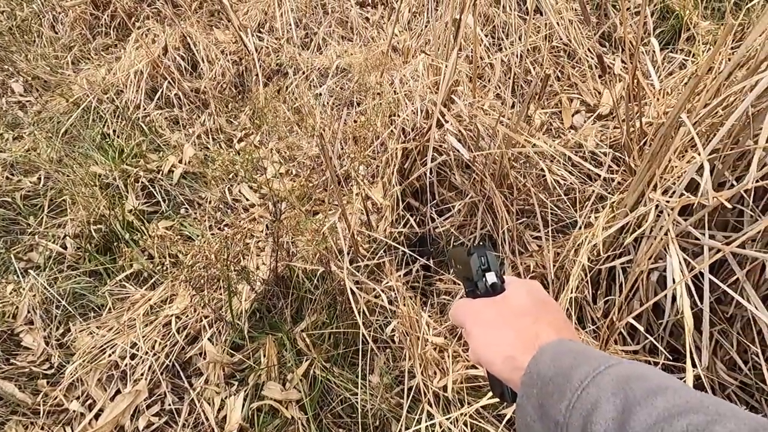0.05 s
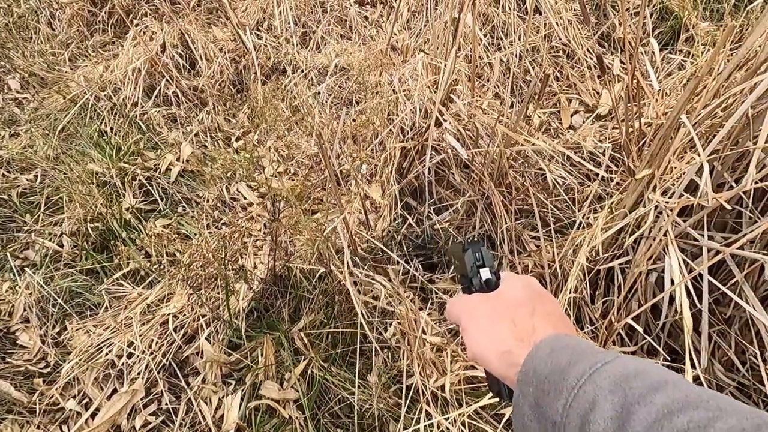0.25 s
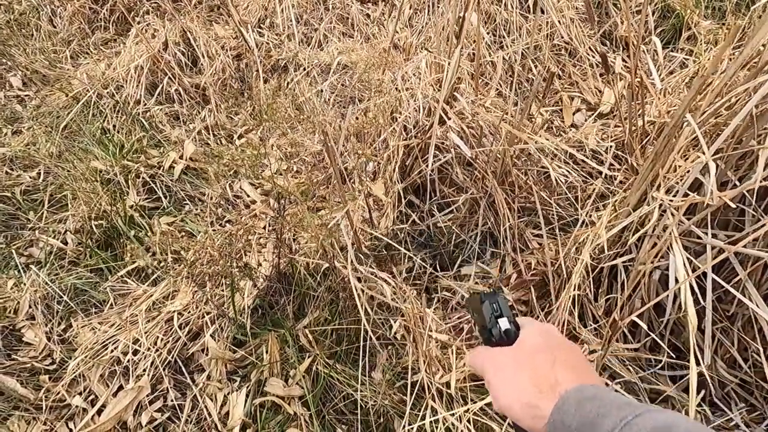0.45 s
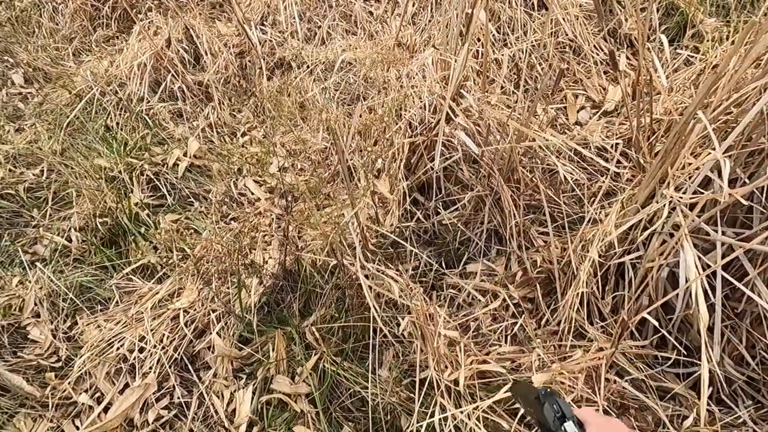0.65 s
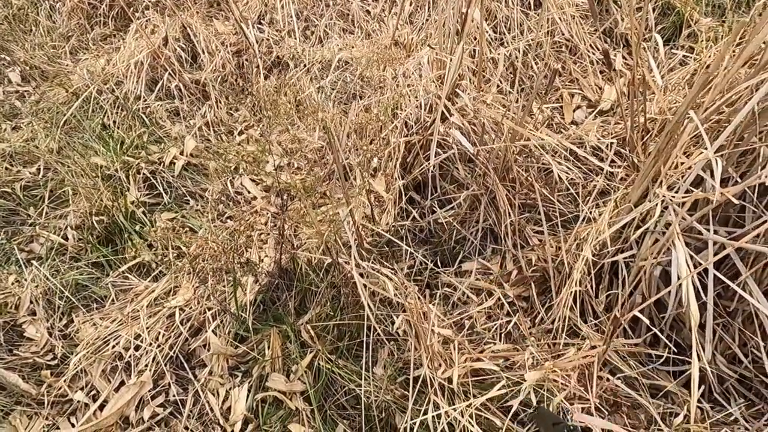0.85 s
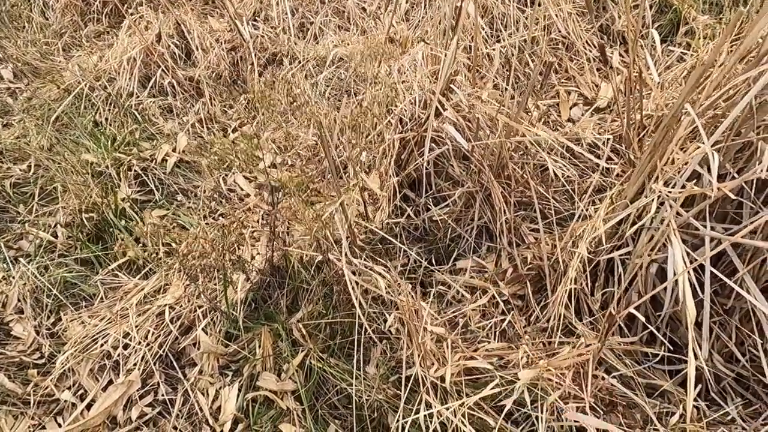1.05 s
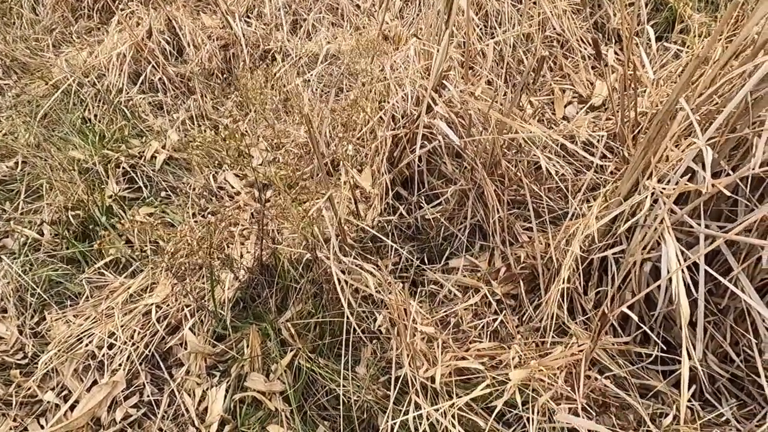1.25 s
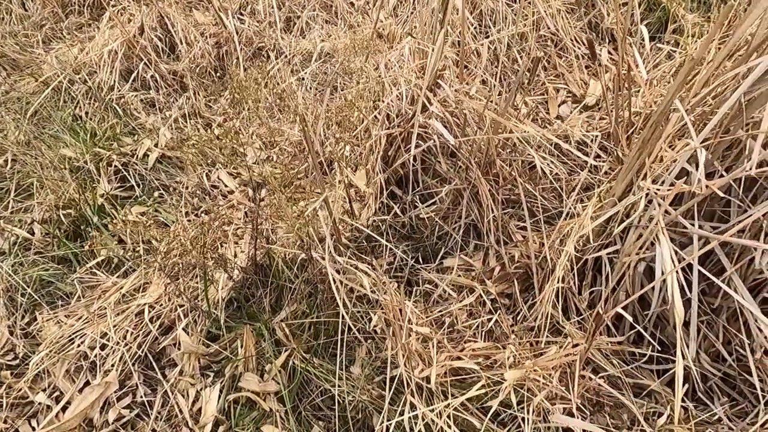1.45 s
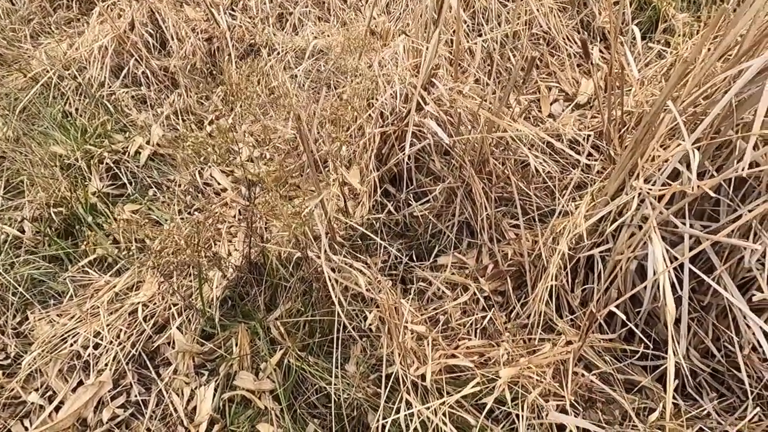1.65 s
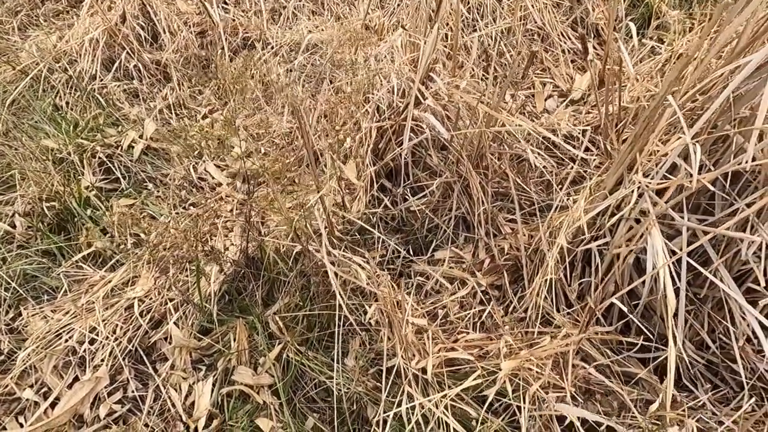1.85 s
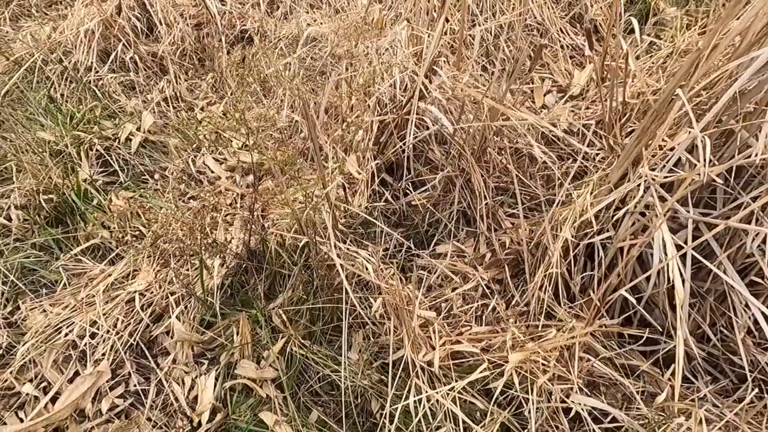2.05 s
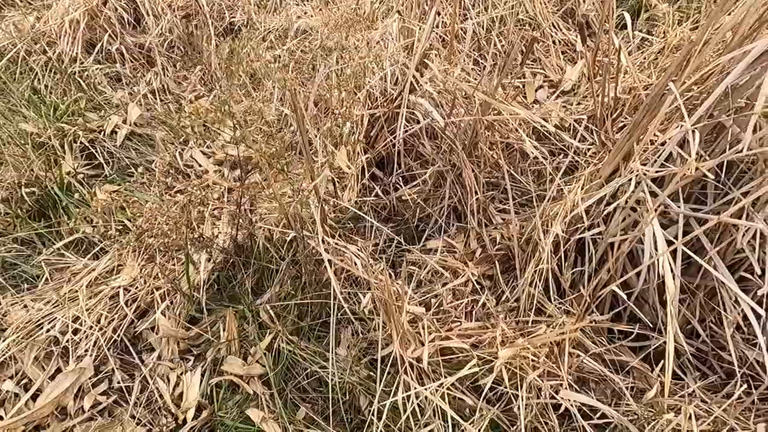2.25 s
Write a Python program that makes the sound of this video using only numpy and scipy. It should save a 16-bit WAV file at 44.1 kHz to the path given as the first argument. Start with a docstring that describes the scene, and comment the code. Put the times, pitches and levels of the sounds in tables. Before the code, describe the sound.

A single pistol shot very close to the microphone outdoors, a hard clipped crack with a short falling boom and faint echoes; then quiet hiss, dry stalk ticks, one metal click and a final knock on the camera.

```python
"""Outdoors over dry grass: one pistol shot close to the microphone, with wind and hiss.
Shaped noise and wandering sines swell into a crack of noise fronts, decaying modes and a falling sine boom.
Noise bursts give the scatter, the faint echoes, the ticking stalks and a soft bump as the arm comes down.
The pistol clicks once as noise and steel modes; at the end a hand knocks (damped modes) and rubs (noise)
on the camera. Wind is fluttering low noise; the hiss dips after the shot, then rises unevenly."""
import sys
import numpy as np
from scipy import signal
from scipy.fft import rfft, irfft
from scipy.io import wavfile

SR = 44100
rng = np.random.default_rng(int(sys.argv[2]) if len(sys.argv) > 2 else 0)


def unload_audio(sound):
    """Save the sound as a 16-bit wav file, at the path given as the first command line argument."""
    columns = np.transpose(np.atleast_2d(sound))
    # keep every value between -1 and 1, then stretch to whole-number steps
    steps = np.round(np.clip(columns, -1, 1) * 32767)
    wavfile.write(sys.argv[1], SR, steps.astype(np.int16))


N = 101429
T = np.arange(N) / SR  # time [s]
HZ = np.fft.rfftfreq(N, 1 / SR)  # frequency [Hz]
SHOT_S = 0.2338

# spectrum of the echoes and of the hand's tick: (frequency [Hz], relative density [dB])
ECHO_SPECTRUM = [(59, -30), (100, 1.5), (224, -2), (360, -21), (807, -15.5), (2470, -16), (5500, -29.5),
                 (14000, -57)]


def amp(db):
    """Decibel law: twenty decibels are a factor of ten in amplitude."""
    return 10 ** (np.asarray(db) / 20)


def unit(x):
    """Normalization: scales a signal to rms 1."""
    return x / np.sqrt(np.mean(x ** 2) + 1e-20)


def colour(points):
    """Spectral envelope: (Hz, dB) points joined along a logarithmic frequency axis, as gain."""
    f, db = np.transpose(points)
    return amp(np.interp(np.log(HZ + 1), np.log(f + 1), db))


def level(points):
    """Temporal envelope: (s, dB) points joined by straight lines in decibels, as gain."""
    return amp(np.interp(T, *np.transpose(points)))


def noise(gain):
    """Filtered noise: white noise weighted by a spectral gain, at rms 1."""
    return unit(irfft(rfft(rng.standard_normal(N)) * gain, N))


def band(hz, width):
    """Resonance curve: gain peaks at one frequency and is halved one width away."""
    return 1 / (1 + np.abs((HZ - hz) / width) ** 3)


def burst(start, decay_s, rise_s=0.00054):
    """Transient envelope: exponential rise and exponential decay from the start."""
    age = np.maximum(T - start, 0)
    return (1 - np.exp(-age / rise_s)) * np.exp(-age / decay_s)


def flutter(rate_hz, depth_db):
    """Amplitude modulation: a random gain of rms depth_db, band-limited near rate_hz."""
    return amp(depth_db * noise(1 / (1 + (HZ / rate_hz) ** 4)))


def ring(start, modes):
    """Modal decay: each sine falls by 60 dB in its t60."""
    age = np.maximum(T - start, 0)
    out = 0
    for hz, db, t60 in modes:
        out = out + amp(db) * np.exp(-np.log(1000) * age / t60) * np.sin(2 * np.pi * hz * age)
    return out


def wind():
    """Turbulent pressure at the microphone: low-frequency noise with random modulation."""
    # (frequency [Hz], relative density [dB])
    spectrum = [(20, -2.5), (58, 3), (100, -6), (200, -17), (350, -29.5), (500, -37.5), (1100, -76)]
    # gusts: (time [s], level [dB])
    gusts = [(0, -40.5), (0.125, -29.5), (0.18, -36), (0.3, -46.5), (0.39, -57), (0.61, -52.5),
             (0.73, -57.5), (0.83, -54.5), (1.0, -58), (1.4, -47.5), (1.7, -45), (1.87, -38), (2.03, -47.5),
             (2.3, -53)]
    return level(gusts) * noise(colour(spectrum)) * flutter(rate_hz=15, depth_db=2.5)


def air():
    """Broadband ambience: outdoor hiss plus narrow noise bands under Gaussian envelopes."""
    # hiss: (frequency [Hz], relative density [dB])
    spectrum = [(100, -10), (200, -2.5), (350, -11), (500, -10.5), (1000, -19), (1400, -18.5), (3700, -27),
                (7000, -34.5), (12500, -50.5), (15500, -70)]
    # hiss: (time [s], level [dB])
    swell = [(0, -66), (0.17, -67), (0.4, -76.5), (0.68, -72), (0.84, -66.5), (1.0, -66), (1.2, -59),
             (1.5, -63.5), (1.8, -58), (2.0, -54), (2.17, -51.5), (2.3, -50.5)]
    # faint hollow bands: (middle [s], half length to 1/e [s], centre [Hz], width [Hz], level [dB])
    hollow_bands = [(0.083, 0.3, 1392, 261, -70), (0.86, 0.047, 1220, 110, -67.5),
                    (1.2, 0.23, 1240, 70, -70.5), (1.219, 0.21, 2960, 110, -74.5)]
    hiss = level(swell) * noise(colour(spectrum)) * flutter(rate_hz=20, depth_db=1.8)
    hollow = 0
    for middle, half, hz, width, db in hollow_bands:
        envelope = amp(db) * np.exp(-((T - middle) / half) ** 2)
        hollow = hollow + envelope * noise(band(hz, width))
    return hiss + hollow


def rush():
    """Resonance in noise: a harsh band and wandering sines swell ahead of the crack and die behind it."""
    # (frequency [Hz], relative density [dB])
    spectrum = [(100, -3), (300, -17), (680, -4), (1000, -12.5), (1400, -1.5), (1950, -1), (2550, -14),
                (3050, -4.5), (3550, -15), (4900, -1.5), (5800, -13.5), (6250, -7), (7800, -11),
                (9000, -19.5), (10200, -16), (12500, -23.5), (15200, -39)]
    # narrow resonances: (frequency [Hz], relative level [dB])
    resonances = [(1354, -1.5), (1445, -0.5), (1563, -5.5), (1645, 2), (1823, -3.5), (1931, -4),
                  (2314, -1.5), (2950, -8), (3231, -6.5), (3890, -10), (4545, -5.5), (4738, -5.5),
                  (5015, -5.5), (5530, -7.5), (6240, -6.5), (6703, -11.5)]
    lead_s, rise_s, rise_db = 0.016, 0.03, 46  # full at lead_s before the shot, rise_db lower rise_s earlier
    fall_db_per_s, wander_hz = 1299.5, 6  # wander is the rms frequency deviation
    early = np.maximum(SHOT_S - lead_s - T, 0) / rise_s
    late = np.maximum(T - SHOT_S - .003, 0)
    shape = amp(-rise_db * early ** 2 - fall_db_per_s * late)
    rings = 0
    for hz, db in resonances:
        cycles = np.cumsum(hz + wander_hz * noise(HZ < 60)) / SR
        rings = rings + amp(db) * np.sin(2 * np.pi * (cycles + rng.random()))
    harsh = amp(-19) * noise(colour(spectrum)) * flutter(rate_hz=570, depth_db=1.5)
    return shape * (harsh + amp(-15) * unit(rings))


def scatter():
    """Diffuse scattering: the blast decays as noise in the nearby grass, with a faint burst ahead of it."""
    # (frequency [Hz], relative density [dB])
    spectrum = [(200, -1.5), (450, -11), (800, -4.5), (1050, -9), (1600, 0.5), (2400, -1.5), (3500, -8),
                (6000, -9), (9000, -19.5), (12500, -24.5), (15200, -36.5)]
    dying = amp(-15) * burst(SHOT_S, decay_s=0.014, rise_s=0.0025)
    ahead = amp(-39) * burst(0.19, decay_s=0.0065, rise_s=.002)
    return (dying + ahead) * noise(colour(spectrum)) * flutter(rate_hz=1200, depth_db=2.5)


def blast():
    """Blast wave: steep fronts excite ringing, with a shock pulse, a gas puff and a boom falling in pitch."""
    # direct front and its ground reflection: (time [s], level [dB], decay [s])
    fronts = [(0.2338, -6.5, .0012), (0.2390, -12, .0013)]
    # crack: (frequency [Hz], relative density [dB])
    crack_spectrum = [(100, -13), (1200, -2.5), (2400, 1), (4500, -6), (7000, -20.5), (15000, -34)]
    # ringing of each front: (frequency [Hz], level relative to the front [dB], t60 [s])
    bite_modes = [(2330, 2.5, .016), (815, -12, .04), (590, -9, .035), (335, -5, .04)]
    # muzzle gas: (frequency [Hz], relative density [dB])
    puff_spectrum = [(40, -4.5), (150, -2), (300, 2.5), (460, -16), (600, -6), (820, -2), (1050, -18.5),
                     (8000, -61.5)]
    boom_s, boom_hz, sag_s, peak_s = 0.2352, 248, 0.019, 0.005  # start, first pitch, its decay, peak delay

    steps = sum(amp(db) * burst(s, decay, rise_s=.0001) for s, db, decay in fronts)
    crack = noise(colour(crack_spectrum)) * steps
    bite = sum(amp(db) * ring(s, bite_modes) for s, db, _ in fronts)

    age = np.maximum(T - boom_s, 0)
    u = age / peak_s
    cycles = boom_hz * sag_s * (1 - np.exp(-age / sag_s))  # pitch falls exponentially
    boom = -amp(-6) * (u * np.exp(1 - u)) ** 2 * np.sin(2 * np.pi * cycles)

    # pressure jump that decays through zero after 0.82 ms
    v = np.maximum(T - SHOT_S - .0014, 0) / 0.00082
    shock = -amp(-4.0) * (v > 0) * (1 - v) * np.exp(-v)

    puff = amp(-16) * noise(colour(puff_spectrum)) * burst(SHOT_S, decay_s=0.0099, rise_s=0.0024)
    return crack + bite + boom + shock + puff


def echoes():
    """Reflection and reverberation: separate delayed returns over a faint tail scattered by the field."""
    # (time [s], relative level [dB], decay [s])
    arrivals = [(0.274, -36.5, 0.0065), (0.3193, -39, 0.0084), (0.339, -46, 0.011), (0.4298, -46.5, 0.012),
                (0.448, -52.5, 0.013), (0.48, -61, .035)]
    # tail: (frequency [Hz], relative density [dB])
    tail_spectrum = [(400, -13.5), (1400, -1.5), (3000, -0.5), (5500, -3), (9000, -14.5), (14000, -22.5)]
    returns = sum(amp(db) * burst(s, decay, rise_s=0.00099) for s, db, decay in arrivals)
    tail = amp(-54.5) * burst(SHOT_S, decay_s=0.13, rise_s=0.024) * flutter(rate_hz=50, depth_db=3.0)
    return amp(1.5) * returns * noise(colour(ECHO_SPECTRUM)) + tail * noise(colour(tail_spectrum))


def stalks():
    """Impulsive excitation: brittle ticks, each focused on its own band, and a faint rustle."""
    # dry stalks: (time [s], level [dB], decay [s], centre of focus [Hz])
    ticks = [(0.397, -46, 0.0031, 6270), (0.774, -58.5, 0.008, 4897), (0.797, -64, 0.017, 6040),
             (0.852, -56, 0.009, 1900), (0.898, -62, .008, 2800), (1.2565, -55.5, 0.0046, 2300)]
    # (frequency [Hz], relative density [dB])
    spectrum = [(200, -20), (1000, -5.5), (3000, 5.5), (7000, 2.5), (10500, -7), (13000, -10), (15500, -15)]
    rustle = amp(-69) * burst(0.742, decay_s=0.19, rise_s=.03)
    out = rustle * noise(colour(spectrum) / (1 + HZ / 5000))
    for s, db, decay, hz in ticks:
        focus = 1 / np.sqrt(1 + (np.log((HZ + 1) / hz) / 0.27) ** 2)
        out = out + amp(db) * burst(s, decay, rise_s=0.00062) * noise(colour(spectrum) * focus)
    return out * flutter(rate_hz=620, depth_db=2)


def sleeve():
    """Damped low resonance: a soft bump of narrow-band noise as the arm comes down."""
    return amp(-47) * burst(0.81, decay_s=0.031, rise_s=0.0035) * noise(band(hz=252, width=87))


def click():
    """Impact of steel: a part snaps home and rattles twice, as noise bursts and decaying modes."""
    # snap and rattles: (time [s], relative level [dB], decay [s])
    impacts = [(1.0629, -27, 0.0015), (1.0686, -44, 0.0028), (1.073, -50, 0.0023)]
    # (frequency [Hz], relative density [dB])
    spectrum = [(1000, -10.5), (1800, 1.5), (4300, 3.5), (8000, 1), (10400, -16), (15500, -19)]
    # steel modes: (frequency [Hz], relative level [dB], t60 [s])
    steel_modes = [(1850, -7, 0.018), (2630, -17, 0.018), (3740, 1, 0.009), (4290, 2, 0.008)]
    snap = sum(amp(db) * burst(s, decay, rise_s=.0001) for s, db, decay in impacts)
    tail = amp(-47) * burst(impacts[0][0], decay_s=0.011)
    rings = sum(amp(db) * ring(s, steel_modes) for s, db, _ in impacts)
    return amp(-5.5) * (snap + tail) * noise(colour(spectrum)) + amp(-3.0) * rings


def handling():
    """Structure-borne impact and friction: a hand knocks the camera body, ticks against it and rubs it."""
    # camera body modes: (frequency [Hz], relative level [dB], t60 [s])
    case_modes = [(361, 2.5, 0.054), (557, -27, 0.027), (820, -5.5, 0.011), (1170, -6, 0.009)]
    # rub: (frequency [Hz], relative density [dB])
    rub_spectrum = [(100, -22.5), (330, 1), (640, -0.5), (900, -10), (2000, -22), (3500, -25.5),
                    (5300, -35.5), (14000, -59)]
    # rub: (time [s], level [dB])
    rub_level = [(2.18, -79), (2.19, -32), (2.21, -43.5), (2.222, -43.5), (2.24, -49.5), (2.252, -43),
                 (2.266, -45), (2.28, -38.5), (2.3, -39.5)]
    palm_hz = 3200  # the soft hand muffles the knock above this
    tick = amp(-41) * burst(2.1958, decay_s=0.001) * noise(colour(ECHO_SPECTRUM))
    thud = irfft(rfft(ring(2.1885, case_modes)) / (1 + (HZ / palm_hz) ** 2), N)
    rub = level(rub_level) * noise(colour(rub_spectrum)) * flutter(rate_hz=150, depth_db=1.5)
    return amp(-23.5) * thud + tick + rub


def scene():
    """Superposition: all sources add in the middle; opposite-phase noise gives the shot's treble some width."""
    mid = wind() + air() + rush() + scatter() + blast() + echoes() + stalks() + sleeve() + click() + handling()
    # (frequency [Hz], relative density [dB])
    side_spectrum = [(900, -52), (1500, 1), (5000, -5), (9000, -6.5), (13000, -3.5)]
    around_shot = np.exp(-((T - SHOT_S + .007) / .02) ** 2)
    width = amp(-40) * around_shot * noise(colour(side_spectrum))
    return np.array([mid + width, mid - width])


def record(dry):
    """Saturation and band limiting: hard clipping at full scale, then a low-pass filter at 15450 Hz."""
    lowpass = signal.firwin(511, 15450, window=("kaiser", 9), fs=SR)
    return signal.oaconvolve(np.clip(dry, -1, 1), lowpass[None], "same")


dry = scene()
out = record(dry)
unload_audio(out)
```